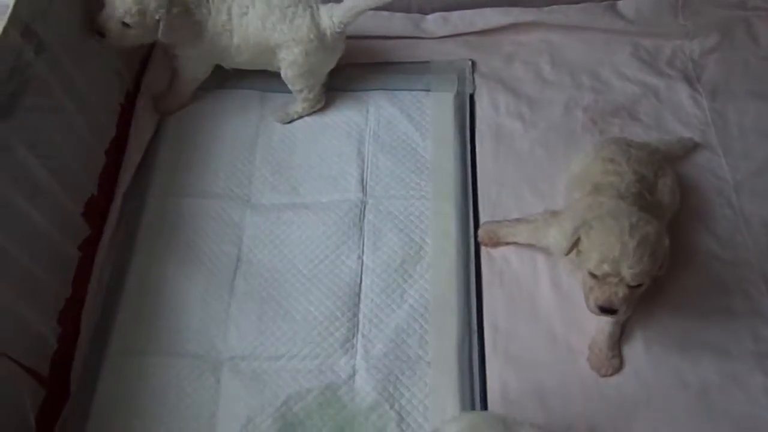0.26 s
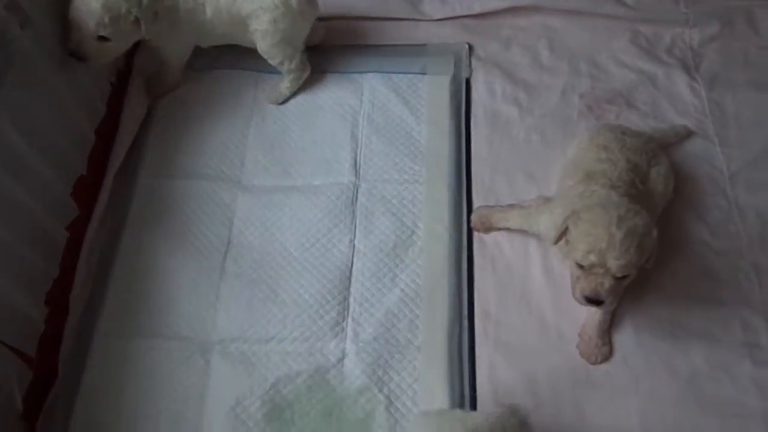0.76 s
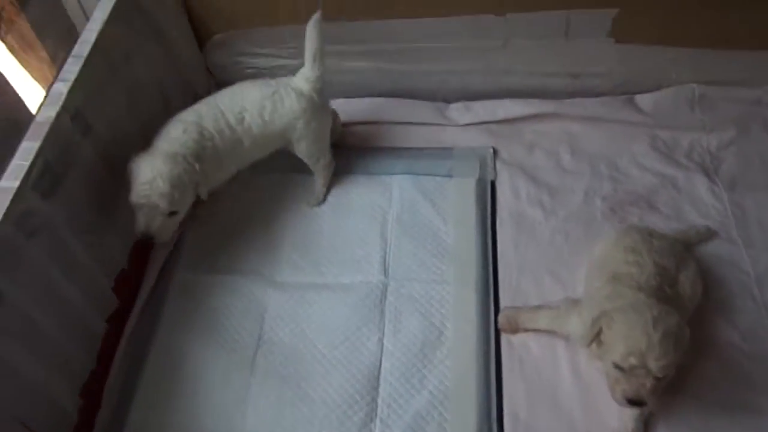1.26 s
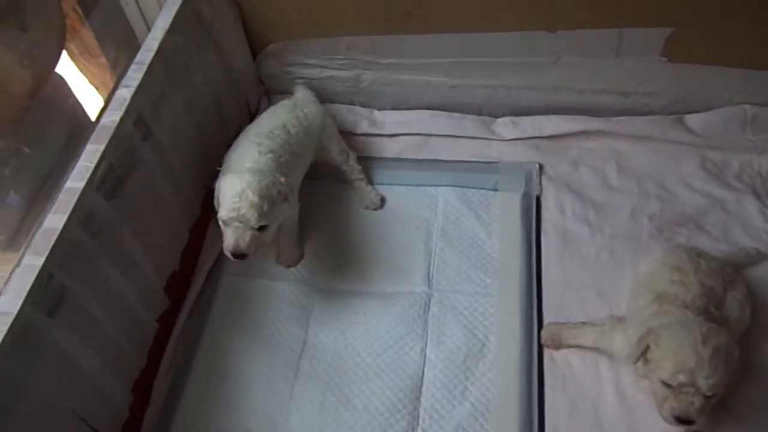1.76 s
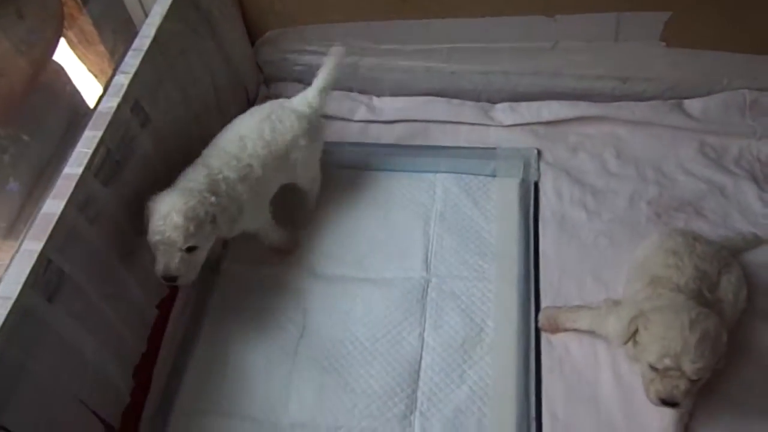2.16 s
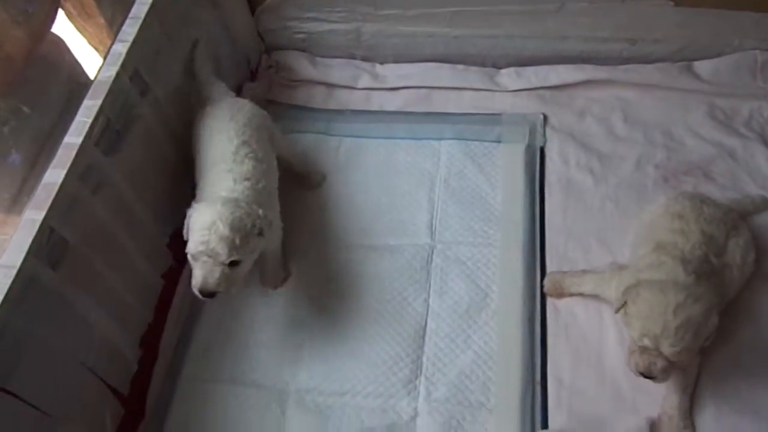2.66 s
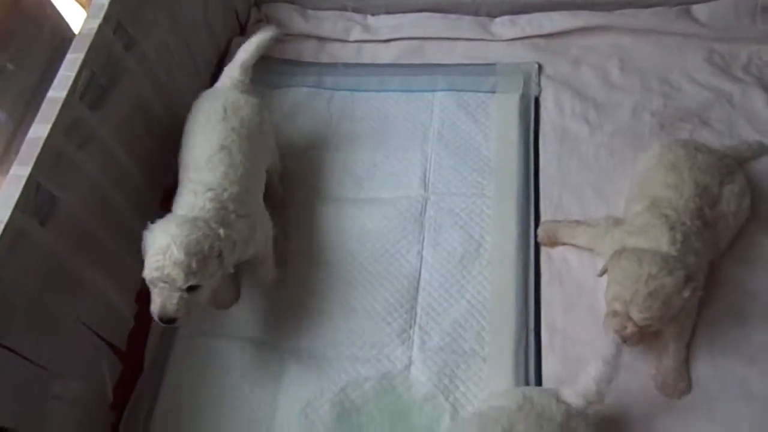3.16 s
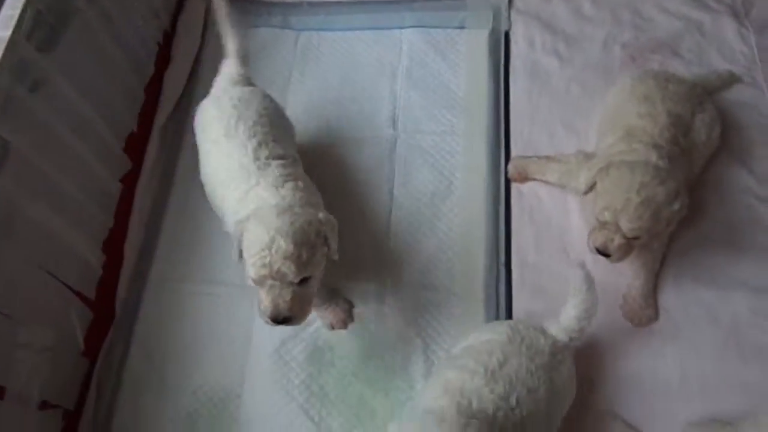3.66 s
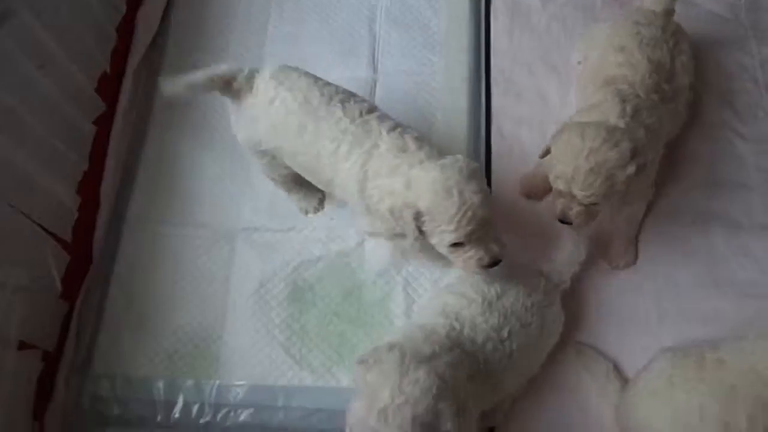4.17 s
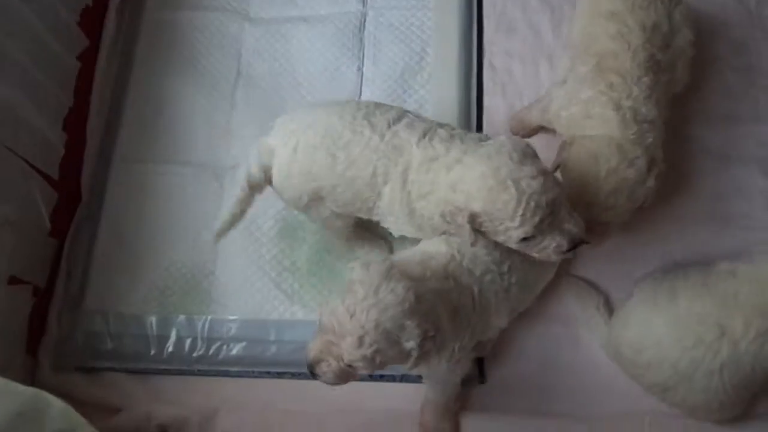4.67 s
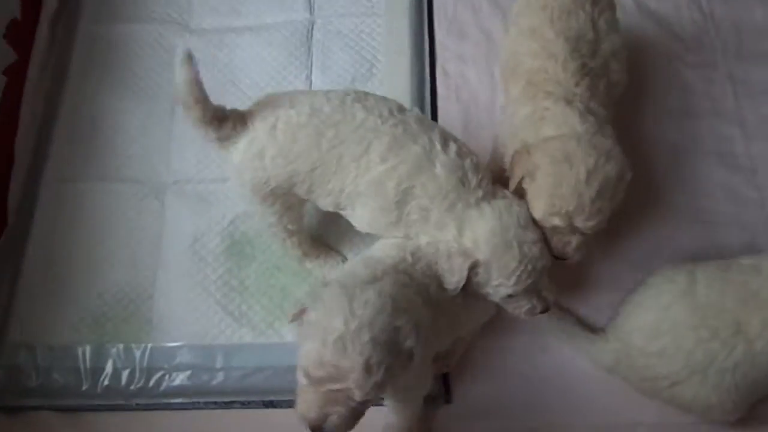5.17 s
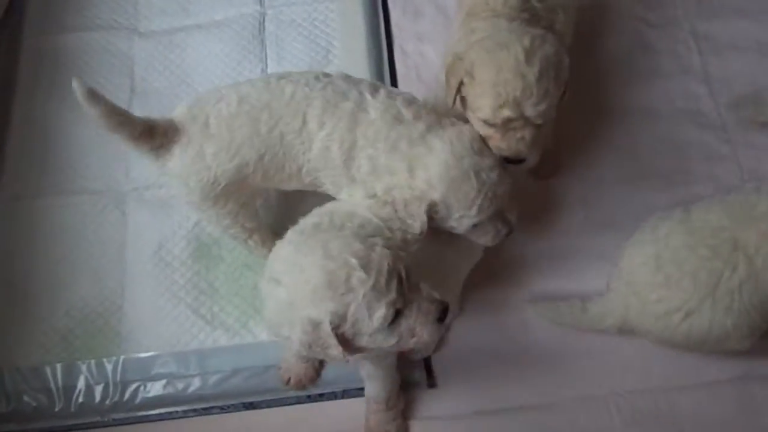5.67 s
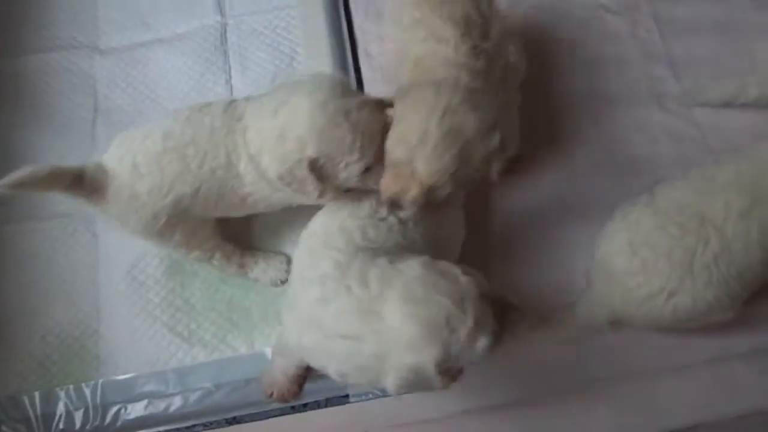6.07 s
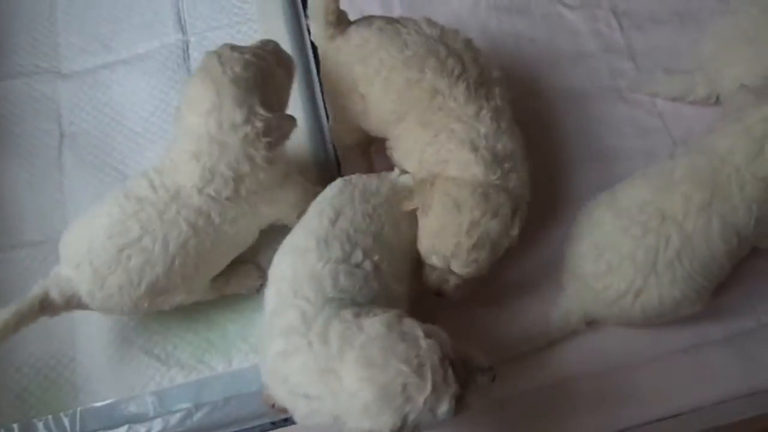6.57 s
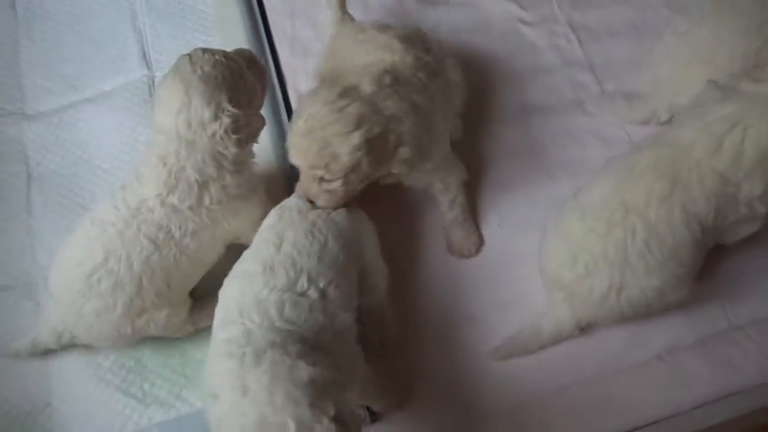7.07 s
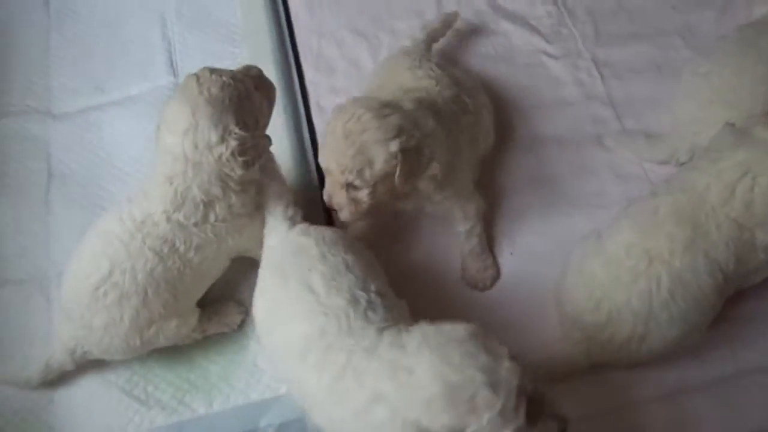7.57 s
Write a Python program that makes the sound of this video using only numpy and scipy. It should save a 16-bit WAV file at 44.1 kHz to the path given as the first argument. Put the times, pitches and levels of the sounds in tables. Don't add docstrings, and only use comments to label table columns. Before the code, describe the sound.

Young puppies in a small hard room: faint grunts and claw ticks, a harsh overloaded bark, later hoarse barks, whines, a yip and a clear squeal.

```python
import sys
import numpy as np
from scipy import signal
from scipy.fft import rfft, irfft, next_fast_len
from scipy.io import wavfile
from scipy.ndimage import uniform_filter1d, minimum_filter1d, map_coordinates

SR = 44100
rng = np.random.default_rng(int(sys.argv[2]) if len(sys.argv) > 2 else 0)


def makeup_ratio(level_db):
    decades = np.asarray(level_db, float) / 20
    return 10 ** decades


def materialize(psi):
    bounded = np.clip(np.atleast_2d(psi).T, -1, 1)
    quanta = np.round(bounded * 32767).astype(np.int16)
    wavfile.write(sys.argv[1], SR, quanta)


N = 344421
LONGEST = SR * 2 // 5
MID_TO_SIDES = np.array([[1], [-1]])


def unit(x):
    return x / np.sqrt(np.mean(x ** 2) + 1e-20)


def along(points, hz):
    f, v = np.transpose(points)
    return np.interp(np.log(hz + 1), np.log(f + 1), v)


def bell(t, at, half):
    return np.exp(-((t - at) / half) ** 2)


def wobble(rate):
    knots = rng.standard_normal(int(N * rate / SR) + 4)
    return map_coordinates(knots, [np.arange(N) * rate / SR])


def flutter(rate, t, count=1):
    knots = rng.standard_normal((count, int(LONGEST * rate / SR) + 4))
    at = (t - t[0]) * rate
    whole = at.astype(int)
    ease = .5 - .5 * np.cos(np.pi * (at - whole))
    return knots[:, whole] * (1 - ease) + knots[:, whole + 1] * ease


def coloured(x, spectrum):
    m = next_fast_len(x.shape[-1] + 8192)
    gain = makeup_ratio(along(spectrum, np.fft.rfftfreq(m, 1 / SR)))
    return irfft(rfft(x, m) * gain, m)[..., :x.shape[-1]]


def spans(tables, fade_s):
    for table in tables:
        s, *cols = np.transpose(table)
        first = max(round(s[0] * SR), 0)
        t = np.arange(first, min(round(s[-1] * SR), N, first + LONGEST)) / SR
        gate = np.clip(np.minimum(t - t[0], s[-1] - t) / fade_s, 0, 1)
        curves = [uniform_filter1d(np.interp(t, s, c), size=220, mode="nearest") for c in cols]
        yield first, t, curves, gate


# (time [s], pitch [Hz], effort [dB], mouth opening [dB])
BARK_CALLS = [
    [(.849, 1006, -31.5, 9), (.866, 1570, -17, -2), (.882, 1741, -0.5, -7.5), (.906, 1750, -4, -10),
     (.936, 1686, -17, -5.5), (.944, 1640, -32.5, -3.5)],
    [(3.286, 1075, -27.5, 9), (3.3, 1552, -15.5, -2.5), (3.316, 1590, -9.5, -2), (3.321, 1640, -3.5, -5.5),
     (3.345, 1494, -15.5, 4), (3.357, 1599, -9, -4), (3.374, 1528, -14, -9), (3.38, 1269, -29.5, -5),
     (3.39, 1114, -51, 6.5)],
    [(3.528, 967, -33.5, 4), (3.544, 1419, -9, -7.5), (3.58, 1625, -6, -16), (3.605, 1538, -10, -14),
     (3.658, 1386, -10.5, -29), (3.67, 1221, -32.5, -22.5), (3.71, 891.6, -30, -23.5),
     (3.742, 928.5, -22, -16), (3.762, 876, -39.5, -23.5)],
]
# (time [s], pitch [Hz], effort [dB], mouth opening [dB])
RASP_CALLS = [
    [(.936, 1180, -30, -6.5), (.948, 1067, -26.5, -4), (.96, 922, -37.5, -7.5)],
    [(3.594, 2365, -30.5, -30), (3.604, 2266, -12.5, -33), (3.62, 1950, -14, -30),
     (3.634, 1815, -23.5, -28)],
]
# (frequency [Hz], level [dB])
BARK_THROATS = [
    [(900, -29), (1500, -11), (2400, -17.5), (3200, -16.5), (3700, -8), (4200, -17.5), (4650, -12),
     (5600, -19), (6300, -8.5), (7100, -20), (9000, -27.5), (15000, -58)],
    [(900, -35.5), (1500, -4), (2200, -9), (2900, -9), (3500, -12.5), (4100, -21), (4800, -13.5),
     (5600, -18.5), (6400, -15), (7700, -22.5), (10000, -38.5), (15000, -47.5)],
    [(900, -34.5), (1500, -5.5), (2100, -8.5), (2800, -15.5), (3500, -16), (4400, -9.5), (5000, -15),
     (5800, -22.5), (7200, -15), (8500, -28), (10500, -30), (15000, -43)],
]
QUARTER_STEPS = [1, 2, 3, 5, 6, 7, 9, 11, 18]
QUARTER_LEVELS = [
    [-36, -32, -15, -11, -6, -20, -16, -9, -30],
    [-39, -35, -17.5, -4, -10, -14.5, -14, -20.5, -31],
    [-33.5, -32, -12, -12, -6, -22, -16, -9.5, -17.5],
]


def barks():
    low, hoarse, fade_s = (0.26, -2, 0.55), 2.6, .003
    out = voice(RASP_CALLS, BARK_THROATS[0], low, usual=.3, hoarse=hoarse, breath_db=0, pop_db=-30, fade_s=fade_s)
    for call, throat, lines_db in zip(BARK_CALLS, BARK_THROATS, QUARTER_LEVELS):
        lines = list(zip(np.divide(QUARTER_STEPS, 4), lines_db))
        out += voice([call], throat, low, lines, usual=.54, hoarse=hoarse, breath_db=5.5, pop_db=-7, fade_s=fade_s)
    return out


# (time [s], pitch [Hz], effort [dB], mouth opening [dB])
SQUEAL_CALLS = [
    [(7.617, 1129, -19.5, 5), (7.632, 1250, -13.5, 4.5), (7.657, 1388, -17.5, 12.5),
     (7.674, 1340, -16.5, 7.5), (7.69, 1215, -13, -2.5), (7.708, 1106, -20, 2.5),
     (7.735, 984.6, -30.5, -1.5), (7.773, 1030, -29, -20), (7.81, 958.5, -31, -39)],
]
# (frequency [Hz], level [dB])
SQUEAL_THROAT = [(900, -22.5), (2400, -3.5), (3200, -13), (3800, 3), (4400, -8.5), (5100, -14.5),
                 (5900, -12), (6800, -7), (7600, -20.5), (9700, -29.5), (11500, -54.5)]
# (time [s], pitch [Hz], effort [dB], mouth opening [dB])
WHIMPER_CALLS = [
    [(6.115, 875, -64, -19), (6.14, 1102, -32.5, -28), (6.152, 1151, -32, -29), (6.156, 1004, -32, -25),
     (6.18, 997, -34, -26), (6.197, 979, -33, -31), (6.201, 1081, -33, -30), (6.222, 1000, -33.5, -24),
     (6.256, 724, -49, -18)],
]
# (frequency [Hz], level [dB])
WHIMPER_THROAT = [(900, 3), (2400, -3), (3200, -5), (4000, -10), (6000, -4.5), (12500, -13), (15000, -45)]
# (multiple of the pitch [1], level [dB])
WHIMPER_SIDE = [(.68, -23), (1.68, -12)]
# (time [s], pitch [Hz], effort [dB], mouth opening [dB])
YIP_CALLS = [
    [(3.049, 1060, -31, -5.5), (3.057, 1112, -27.5, -4), (3.076, 1183, -25, -1), (3.086, 1118, -25, 0.5),
     (3.096, 861, -29.5, -20), (3.102, 830, -49.5, -6.5)],
    [(7.328, 1116, -23.5, -5.5), (7.352, 1210, -25, -5.5), (7.367, 1084, -27.5, 1), (7.382, 910, -35, -19)],
]
# (frequency [Hz], level [dB])
YIP_THROAT = [(900, -36.5), (2400, -4), (3500, -21), (4600, -20), (5800, -16.5), (7000, -24), (8200, -34),
              (15000, -57.5)]


def squeals():
    clean = dict(hoarse=1.2, breath_db=1.5, pop_db=0)
    out = voice(SQUEAL_CALLS, SQUEAL_THROAT, (-8, 0.099, .05), usual=.04, fade_s=.002, **clean)
    out += voice(WHIMPER_CALLS, WHIMPER_THROAT, (-3.6, -0.72, 0.013), WHIMPER_SIDE, usual=.07, fade_s=.002, **clean)
    return out + voice(YIP_CALLS, YIP_THROAT, (-7, 0.12, 0.046), usual=.12, fade_s=.003, **clean)


# (time [s], pitch [Hz], effort [dB], mouth opening [dB])
WHINE_CALLS = [
    [(4.097, 270.3, -48.5, -4), (4.128, 398.4, -28, -12.5), (4.155, 461, -29.5, -15),
     (4.167, 546.4, -31.5, 1.5), (4.192, 523, -31.5, -2), (4.21, 500, -34.5, 8.5), (4.23, 417, -31.5, -2),
     (4.284, 332.4, -35.5, -6.5), (4.326, 279, -38, -2.5), (4.37, 258, -64, -11)],
    [(5.426, 351, -38, -5.5), (5.437, 358.5, -39.5, -10.5), (5.465, 456.5, -37, -1.5),
     (5.495, 441, -35.5, -5), (5.527, 328.2, -36, -2), (5.55, 283.5, -36.5, -6.5), (5.575, 283, -49, -18)],
    [(7.388, 372.6, -46.5, 8.5), (7.416, 341.7, -42.5, -9), (7.43, 352.5, -40, -0.5),
     (7.5, 260.5, -48.5, -20)],
]
# (frequency [Hz], level [dB])
WHINE_THROAT = [(250, -42), (800, 11), (1300, 1), (1500, -9), (2000, -6), (2500, -1.5), (2900, -16),
                (3400, -13.5), (3800, -23), (4500, -17), (5200, -34), (6500, -27), (9000, -39),
                (15000, -78)]
# (multiple of the pitch [1], level [dB])
WHINE_HALVES = [(1.5, -22), (2.5, -8), (3.5, -10), (4.5, -5), (5.5, -16)]
# (frequency [Hz], level [dB])
HOARSE_THROAT = [(250, -68.5), (800, 12.5), (1300, -4.5), (1800, 5), (2550, -12.5), (3200, -18),
                 (4200, -11.5), (6000, -17), (9000, -26), (15000, -79)]
# (time [s], pitch [Hz], effort [dB], mouth opening [dB])
SOB_CALLS = [
    [(3.755, 419, -34, -4.5), (3.799, 425.4, -36.5, -4.5), (3.831, 382, -36.5, -1.5),
     (3.871, 286.4, -44, -55), (3.89, 271, -56.5, -4)],
]


def whines():
    low, hoarse = (0.11, -9, 0.075), 1.5
    out = voice(WHINE_CALLS[:1], WHINE_THROAT, low, WHINE_HALVES,
                usual=.13, hoarse=hoarse, breath_db=2, pop_db=-3, fade_s=.003)
    out += voice(WHINE_CALLS[1:], HOARSE_THROAT, low,
                 usual=.11, hoarse=hoarse, breath_db=4, pop_db=-3, fade_s=.003)
    return out + voice(SOB_CALLS, WHINE_THROAT, (.1, 5.5, 0.61),
                       usual=.1, hoarse=hoarse, breath_db=4, pop_db=-15, fade_s=.005)


def grunt(s, length, first_hz, last_hz, db):
    share = np.array([0, 0.72, 1])
    effort_db = db + np.array([-7.5, 0, -8.5])
    mouth_db = -13 + 0.27 * (effort_db + 47.5)
    hz = first_hz + np.array([0, 0.7, 1]) * (last_hz - first_hz)
    return np.transpose([s + share * length, hz, effort_db, mouth_db])


# (start [s], length [s], first pitch [Hz], last pitch [Hz], peak effort [dB])
GRUNT_EVENTS = [(.004, 0.041, 323, 336, -42), (0.245, 0.028, 308, 283.6, -47.5),
                (1.116, 0.048, 322.1, 242.2, -45.5), (1.585, 0.029, 430, 319, -46),
                (1.868, 0.023, 472, 370, -41), (2.762, 0.036, 304, 310, -57),
                (4.592, 0.094, 317.6, 336.6, -42), (4.898, 0.05, 415.5, 264.4, -39),
                (5.15, 0.072, 274, 261.7, -43), (5.148, .028, 370, 428, -47),
                (5.196, 0.0242, 510, 332, -46.5), (6.432, .022, 324.5, 312.4, -51),
                (5.632, 0.052, 235, 243.7, -46), (5.771, 0.05, 281, 250, -50)]


def grunts():
    return voice([grunt(*row) for row in GRUNT_EVENTS], HOARSE_THROAT, (0.11, 1.5, 0.83),
                 usual=.16, hoarse=.82, breath_db=8.5, pop_db=-15, fade_s=.009)


# (from [s], to [s], roughness [0-1], every-4th-cycle pattern [0-1])
SPELLS = [(.84, .893, .33, 0), (.893, .94, .48, 0), (7.678, 7.76, .09, 0), (.94, .97, .12, 0),
          (7.366, 7.39, .3, 0), (3.04, 3.11, .26, 0), (3.28, 3.298, .3, 0), (3.298, 3.338, .32, .8),
          (3.338, 3.38, .4, .6), (6.156, 6.198, .1, 1), (3.52, 3.54, .32, 0), (3.54, 3.561, .26, 0),
          (3.561, 3.597, .19, 1), (3.597, 3.632, .4, .35), (3.632, 3.9, .1, 0), (4.08, 4.158, .07, 0),
          (4.158, 4.185, .26, .6), (4.185, 4.2, .18, .3), (4.2, 4.225, .2, .7), (7.385, 7.51, .27, 0),
          (5.45, 5.466, .35, 0)]


def folds(t, usual):
    state = np.array([usual + 0 * t, 0 * t])
    for start, end, rough, pattern in SPELLS:
        state[:, (t >= start) & (t < end)] = [[rough], [pattern]]
    return uniform_filter1d(state, size=400, axis=1, mode="nearest")


def torn(x):
    z = signal.stft(x, nperseg=128)[2]
    field = rng.standard_normal((65, LONGEST // 64 + 3))
    field = unit(uniform_filter1d(uniform_filter1d(field, size=2, axis=0), size=7, axis=1))
    depth_db = 5
    return signal.istft(z * makeup_ratio(depth_db * field[:, :z.shape[1]]), nperseg=128)[1][:len(x)]


# (time [s], level [dB], half width [s])
TONGUE = [(.882, 1.5, 0.012), (.915, -6, 0.0087), (3.297, 9, 0.0036), (3.35, -17, 0.033), (3.547, 11, 0.02),
          (3.59, -13, 0.077), (3.66, -2, 0.032), (4.22, 10, 0.046), (6.14, -17.5, 0.013), (6.21, -8, 0.007),
          (7.34, -5, 0.024), (7.66, 4.5, 0.015), (7.78, 5.5, 0.059), (3.075, 4.5, 0.028)]
# (time [s], half width [s], frequency [Hz], half width [octaves], level [dB])
JAW = [(.89, .04, 4800, .12, -4), (.9, .04, 6200, .12, -13), (.915, .02, 3420, .12, -13),
       (3.075, .03, 4580, 0.092, 3.5), (3.075, 0.035, 6500, 0.13, -3), (3.29, 0.009, 1200, .3, -4),
       (3.29, .01, 7000, .6, 4), (3.315, 0.0066, 3700, 0.13, 6), (3.535, 0.023, 11000, 0.6, -28),
       (3.545, .015, 4840, 0.13, 17), (3.675, 0.03, 2000, .35, 5), (3.8, .05, 2900, 0.55, -22),
       (3.8, .05, 1250, 0.18, 5.5), (5.44, 0.013, 820, .2, -13), (5.445, .025, 1120, .15, 4),
       (5.49, .04, 2750, 0.095, 15), (5.52, .03, 1200, 0.12, 4.5), (7.345, 0.031, 8100, .3, -10),
       (.88, .012, 4300, 0.25, 4.5), (7.64, .015, 3900, .12, 2.5), (4.2, .02, 2550, .1, 3),
       (7.375, 0.017, 11500, .1, 13.5), (6.232, .022, 12500, .06, 24), (6.18, 0.032, 6600, .08, 12),
       (4.2, 0.049, 3700, 0.27, -5), (7.625, .012, 4750, 0.11, -16.5), (7.66, 0.015, 8200, .08, -1.5),
       (7.715, 0.045, 3820, 0.24, -23), (7.73, 0.038, 4760, .1, 12), (7.71, .02, 6640, .08, -7)]
# (time [s], depth [dB], half width [s])
CATCHES = [(.872, 4, .003), (.8965, 22, .006), (.908, 4, .0015), (.917, 18, .0035), (.929, 13, .003),
           (.948, 5, .003), (3.315, 5, .003), (3.327, 7, .002), (3.334, 6, .002), (3.343, 6, .005),
           (3.365, 4, .003), (3.381, 8, .004), (3.591, 6, .004), (3.633, 22, .004), (3.664, 16, .004),
           (7.646, 7, .004), (7.68, 10, .0025), (7.694, 7, .0037), (4.122, 6, .004)]


def voice(calls, throat, low, lines=((1, -99),), *, usual, hoarse, breath_db, pop_db, fade_s):
    first_over_db, octave_over_db, mouth_share = low
    out = np.zeros(N)
    multiple, under_db = np.transpose(lines)[..., None]
    k = np.arange(1, 19)[:, None]
    for first, t, (hz, effort_db, mouth_db), gate in spans(calls, fade_s):
        db, upper_db = effort_db + first_over_db, effort_db + mouth_db
        octave_db = effort_db + octave_over_db + mouth_share * mouth_db
        octave_db = octave_db + sum(swell_db * bell(t, at, half) for at, swell_db, half in TONGUE)
        rough, pattern = folds(t, usual)
        hz = hz * (1 + .004 * flutter(60, t)[0] + .07 * rough * flutter(420, t)[0])
        turn = 2 * np.pi * np.cumsum(hz) / SR

        size = makeup_ratio(along(throat, k * hz)) * (k * hz < 15200)
        clear = (1 - rough) ** hoarse
        size[2:] *= makeup_ratio(upper_db) * clear / np.sqrt(np.sum(size[2:] ** 2, axis=0))
        size[0], size[1] = makeup_ratio(db), makeup_ratio(octave_db) * np.sqrt(clear)
        for at, half, centre, wide, jaw_db in JAW:
            if t[0] - 2 * half < at < t[-1] + 2 * half:
                size *= makeup_ratio(jaw_db * bell(t, at, half) * bell(np.log2(k * hz / centre), 0, wide))

        waver = flutter(80, t, count=len(k))
        shimmer = makeup_ratio((2.2 + 4 * rough) * waver)
        slip = .07 * k * hz.mean() / 1000 * waver[::-1]
        phase = k * turn + slip + 2 * np.pi * rng.random(k.shape)
        tone = np.sum(size * shimmer * np.sin(phase), axis=0)
        if pattern.any():
            tone += pattern * makeup_ratio(db) * np.sum(makeup_ratio(under_db) * np.sin(multiple * (turn + 1)), axis=0)

        puffs = torn(rng.standard_normal(LONGEST)[:len(t)]) * (1 + 1.8 * np.cos(turn))
        leak = makeup_ratio(breath_db) * rough + makeup_ratio(pop_db - 60 * (t - t[0]) / .02)
        breath = unit(coloured(puffs, throat)) * leak * np.hypot(makeup_ratio(octave_db), makeup_ratio(upper_db))

        catch_db = sum(depth_db * bell(t, at, half) for at, depth_db, half in CATCHES)
        breath *= makeup_ratio(.35 * catch_db)
        swing = gate * makeup_ratio(-catch_db) * makeup_ratio(3 * rough * flutter(110, t)[0])
        out[first:first + len(t)] += swing * (np.sqrt(2) * tone + breath)
    return out


# (time [s], peak level [dB], ring frequency [Hz])
CLAW_TICKS = [(0.2689, -43, 4920), (0.4407, -51, 2483), (0.6984, -51, 2540), (0.8241, -41.5, 1498),
              (1.1154, -33, 2368), (1.3016, -43, 2278), (1.3429, -48.5, 3204), (1.602, -40.5, 4560),
              (1.6488, -36.5, 3170), (1.685, -38, 2956), (1.8073, -44.5, 3530), (1.8464, -42, 3076),
              (1.8813, -35.5, 2538), (2.0335, -43.5, 3950), (2.3356, -48, 2260), (2.599, -39.5, 2200),
              (2.6702, -43, 3227), (3.9576, -53.5, 2774), (3.9802, -46, 2730), (4.4618, -38.5, 2695),
              (4.7199, -41, 2890), (5.8515, -38, 2450), (5.9326, -43, 6850), (6.1045, -44, 4060),
              (6.1943, -39.5, 3480), (6.279, -45.5, 12000), (6.428, -47, 2500), (6.6842, -40.5, 2620),
              (6.7467, -40.5, 3010), (6.9931, -43, 2454), (7.2823, -47, 2850)]


def claws():
    out, t = np.zeros(N + SR), np.arange(SR // 50) / SR
    decay = makeup_ratio(-60 * t / .006)
    for s, db, hz in CLAW_TICKS:
        ring = decay * np.sin(2 * np.pi * hz * t)
        grit = rng.standard_normal(len(t) + 3)
        snap = .35 * decay * (grit[3:] - grit[:-3])
        out[round(s * SR):][:len(t)] += makeup_ratio(db + 3) * (ring + snap)
    return out[:N]


# (start [s], rise [s], fall [s], peak level [dB])
PAW_DRAGS = [(1.1, .052, 0.049, -38), (1.575, 0.03, .09, -44.5), (1.85, 0.035, .04, -44),
             (2.4, .036, 0.04, -49.5), (3.95, 0.015, .09, -50.5), (4.58, 0.025, .03, -49.5),
             (4.64, 0.026, 0.027, -47.5), (4.7, .07, 0.027, -50), (4.92, 0.036, 0.153, -52.5),
             (6.84, .07, 0.016, -49)]
# (frequency [Hz], level [dB per Hz])
PAD_SPECTRUM = [(350, -44), (600, -30), (765, -34), (1000, -5.5), (2540, -1.5), (3460, -5.5), (5180, -7.5),
                (7750, -13.5), (12800, -19), (15000, -21.5)]


def shuffle():
    out = np.zeros(N)
    drags = [[(s, db - 14), (s + rise, db), (s + rise + fall, db - 17)] for s, rise, fall, db in PAW_DRAGS]
    for first, t, (db,), gate in spans(drags, fade_s=0.011):
        grit = rng.standard_normal(LONGEST)[:len(t)] * makeup_ratio(4.7 * flutter(600, t)[0])
        out[first:first + len(t)] += makeup_ratio(db - 2.5) * gate * unit(coloured(grit, PAD_SPECTRUM))
    return out


# (frequency [Hz], time to fall 60 dB [s])
WALL_DECAY = [(200, 0.88), (1100, 0.32), (1480, 0.35), (1720, 0.41), (2100, .29), (3500, .24), (5000, .26),
              (12000, 0.21)]
# (time [s], level [dB])
BOX_ECHOES = [(.0021, -22.5), (.0048, -10), (.0083, -13), (0.013, -6), (.019, -11.5), (.027, -19.5)]
# (frequency [Hz], level [dB])
ROOM_WIDTH = [(200, -26.5), (1500, -27.5), (4000, -20), (12000, -4.5)]


def room(x):
    hz, t, z = signal.stft(rng.standard_normal((2, SR // 2)), SR, nperseg=256)
    tail = signal.istft(z * makeup_ratio(-60 * t / along(WALL_DECAY, hz)[:, None]), SR, nperseg=256)[1]
    tail /= np.linalg.norm(tail[0])
    mid, side = signal.fftconvolve(np.pad(x, (180, 0))[None], tail, axes=1)[:, :N]
    early = sum(makeup_ratio(db + 4) * np.pad(x, (round(s * SR), 0))[:N] for s, db in BOX_ECHOES)
    return mid + early + MID_TO_SIDES * coloured(side, ROOM_WIDTH)


# (frequency [Hz], level [dB])
BEDDING = [(300, -5), (1750, -0.5), (2050, 3.5), (2700, 4), (3500, 0), (4200, 1.5), (5000, 2.5),
           (8000, 3.5), (14000, 3)]


def through_bedding(x):
    depth_s, rate = .00012, 45
    at = np.arange(N) + depth_s * SR * wobble(rate)
    return coloured(np.array([np.interp(at, np.arange(N), side) for side in x]), BEDDING)


# (time [s], half width [s], level [dB])
THUMP_EVENTS = [
    (.884, 0.008, -40.5),
    (.91, .01, -41.5),
    (3.56, .01, -39.5),
    (3.608, 0.014, -40.5),
    (5.13, .1, -60),
]
# (frequency [Hz], level [dB per Hz])
THUMP_SPECTRUM = [(12, -20.5), (30, 3), (110, -5), (250, -13), (500, -25), (1000, -60)]


def thumps():
    t = np.arange(N) / SR
    swell = sum(makeup_ratio(db) * bell(t, at, half) for at, half, db in THUMP_EVENTS)
    return swell * unit(coloured(rng.standard_normal(N), THUMP_SPECTRUM))


def patchy(spectrum, patchy_db, side_db):
    z = signal.stft(rng.standard_normal((2, N)), nperseg=512)[2]
    field = uniform_filter1d(uniform_filter1d(rng.standard_normal(z.shape[1:]), size=6, axis=0), size=12, axis=1)
    noise = signal.istft(z * makeup_ratio(patchy_db * unit(field)), nperseg=512)[1][:, :N]
    mid, side = coloured(noise, spectrum)
    return unit(mid) + MID_TO_SIDES * makeup_ratio(side_db) * unit(side)


# (time [s], level [dB])
RESTLESSNESS = [(0, -1), (0.802, 0.5), (1.397, 1), (3, -0.5), (4, 2.5), (5.2, -2), (6.9, 1), (7.81, 1.5)]
# (frequency [Hz], level [dB per Hz])
MURMUR_SPECTRUM = [(12, -38.5), (20, -9), (27, -12.5), (69, -2.5), (107, -2), (129, -2.5), (147, -5.5),
                   (209, -8), (264, -5), (484, -3), (784, -2.5), (1170, -6), (3000, -13), (3900, -43.5),
                   (6600, -120)]
# (frequency [Hz], level [dB per Hz])
HISS_SPECTRUM = [(1940, -33), (3300, -2), (5920, -7), (6850, -7.5), (13400, -8), (15100, -10)]


def air():
    restless_db = np.interp(np.arange(N) / SR, *np.transpose(RESTLESSNESS))
    murmur_db = -55 + restless_db + 0.41 * wobble(4.7)
    hiss_db = -59.5 + .4 * restless_db + 0.34 * wobble(8.3)
    murmur = makeup_ratio(murmur_db) * patchy(MURMUR_SPECTRUM, patchy_db=1.6, side_db=-15)
    return murmur + makeup_ratio(hiss_db) * patchy(HISS_SPECTRUM, patchy_db=2.6, side_db=-14.5)


# (frequency [Hz], unsteadiness [knots per s], level [dB])
HUM_LINES = [(110, 8.8, -70), (267, 30, -71)]


def hum():
    turn = 2 * np.pi * np.arange(N) / SR
    return sum(makeup_ratio(db) * (wobble(rate) * np.sin(hz * turn) + wobble(rate) * np.cos(hz * turn))
               for hz, rate, db in HUM_LINES)


def scene():
    harsh, clean, soft, paws = barks(), squeals(), whines() + grunts(), claws() + shuffle()
    answer = room(makeup_ratio(-12) * harsh + makeup_ratio(-15) * clean + makeup_ratio(-13.5) * soft + makeup_ratio(-12) * paws)
    direct = harsh + clean + soft + paws
    return direct + through_bedding(answer) + air() + hum() + thumps()


def top_cut(x):
    return signal.sosfilt(signal.butter(12, 15210, fs=SR, output="sos"), x)


# (frequency [Hz], level [dB])
LOW_CUT = [(20, -3), (170, -4), (280, 0)]


def record(dry):
    limit, reach = 1.5, round(.003 * SR)
    need = minimum_filter1d(limit / np.maximum(np.abs(dry).max(axis=0), limit), size=2 * reach)
    held = dry * uniform_filter1d(need, size=reach)
    clipped = coloured(held / (1 + np.abs(held / .99) ** 14) ** (1 / 14), LOW_CUT)
    mid = clipped.mean(axis=0)
    passes = uniform_filter1d(1. * (wobble(24) > .55), size=200)
    mix = mid + makeup_ratio(6.5) * (clipped - mid) * passes
    return top_cut(mix)


dry = scene()
out = record(dry)
materialize(out)
```